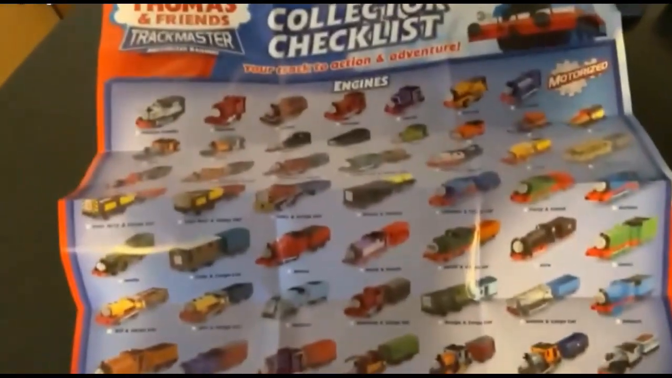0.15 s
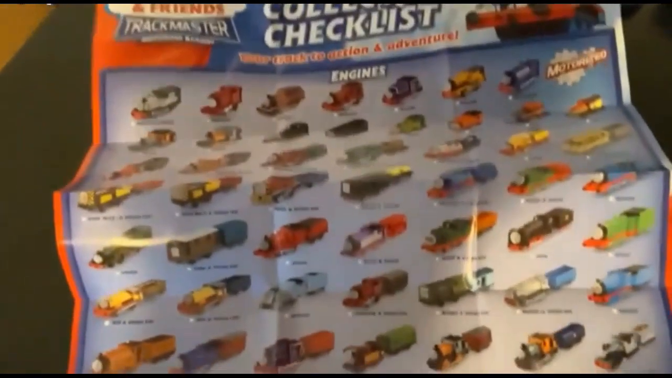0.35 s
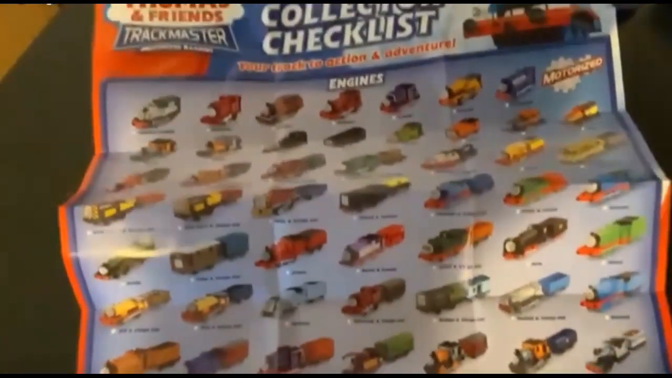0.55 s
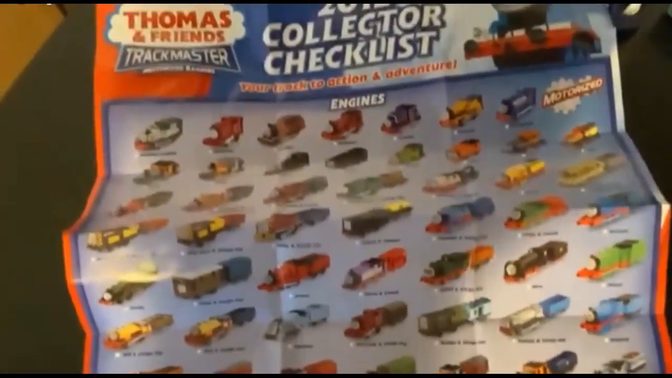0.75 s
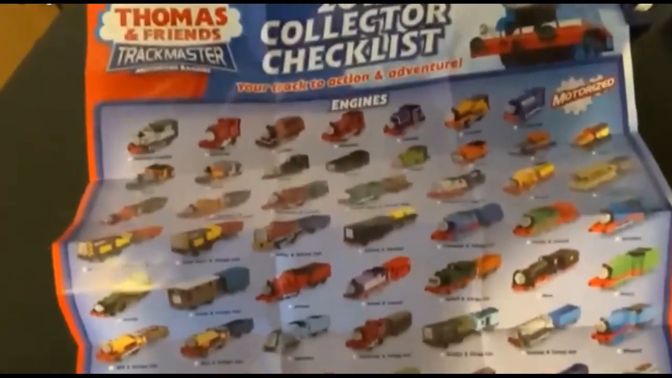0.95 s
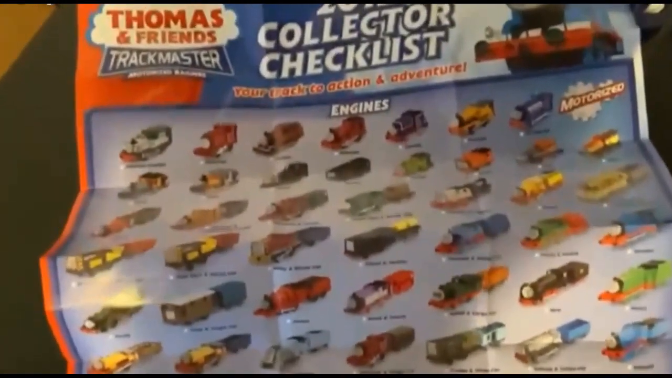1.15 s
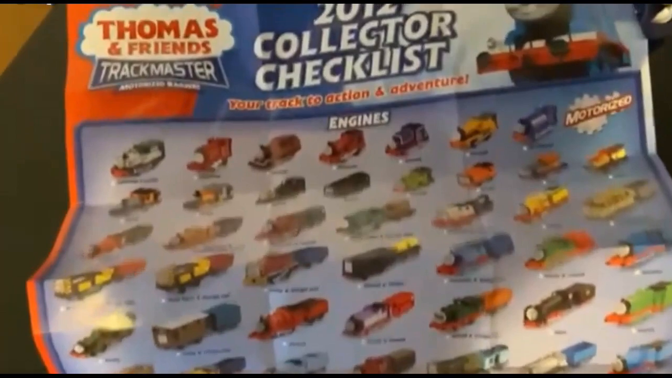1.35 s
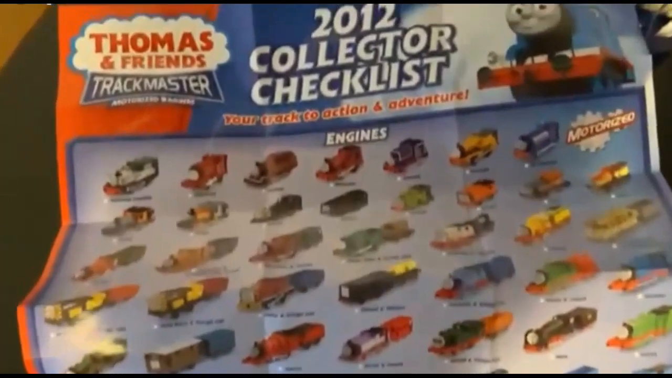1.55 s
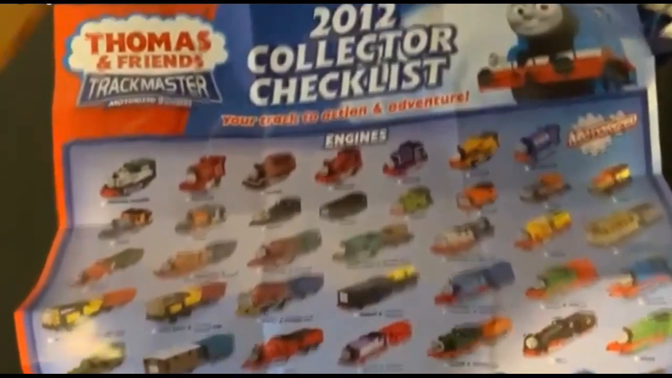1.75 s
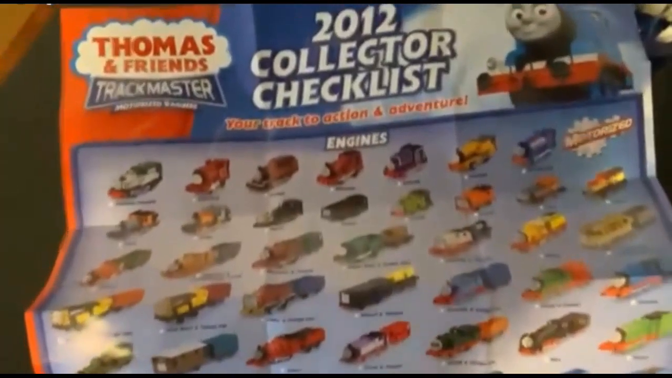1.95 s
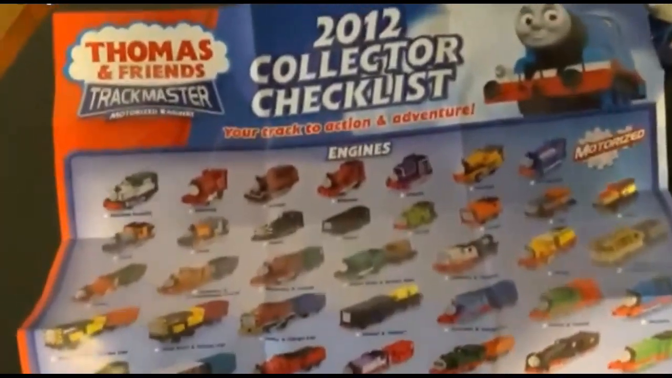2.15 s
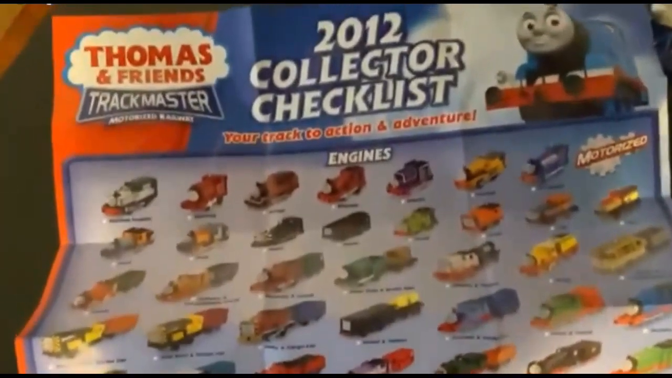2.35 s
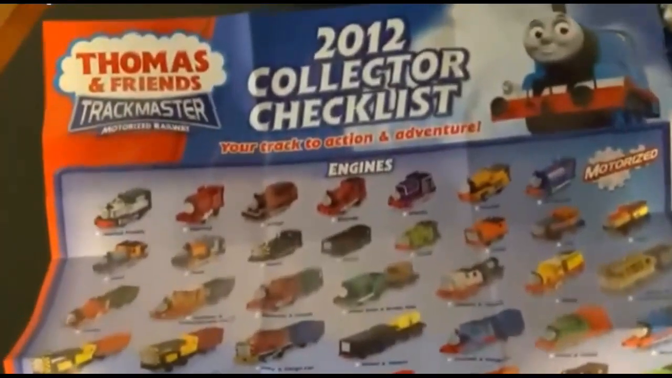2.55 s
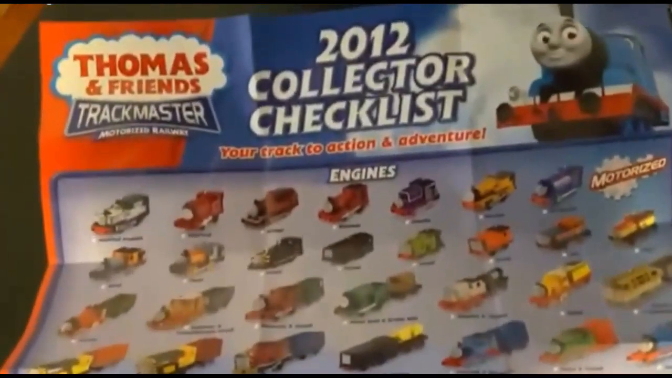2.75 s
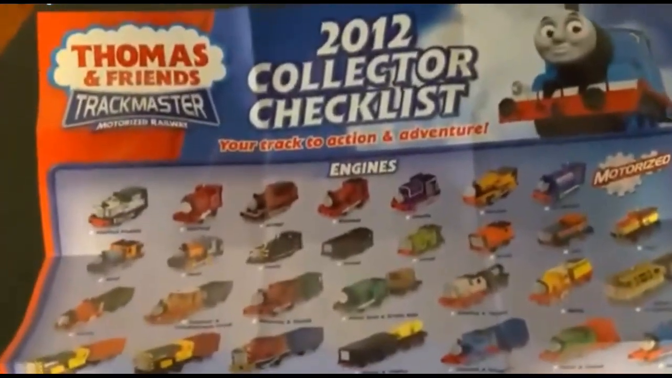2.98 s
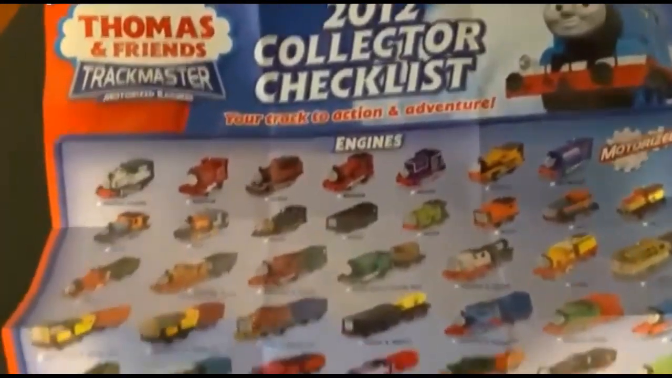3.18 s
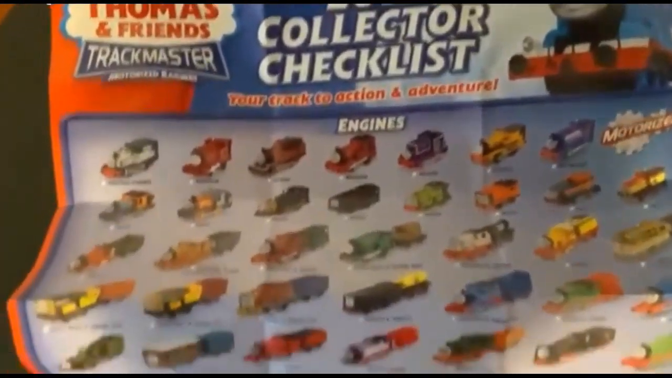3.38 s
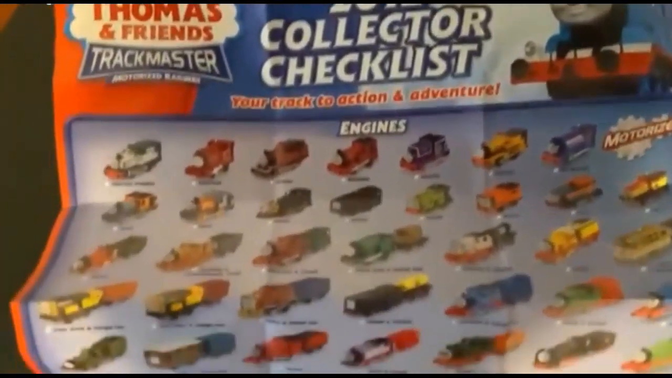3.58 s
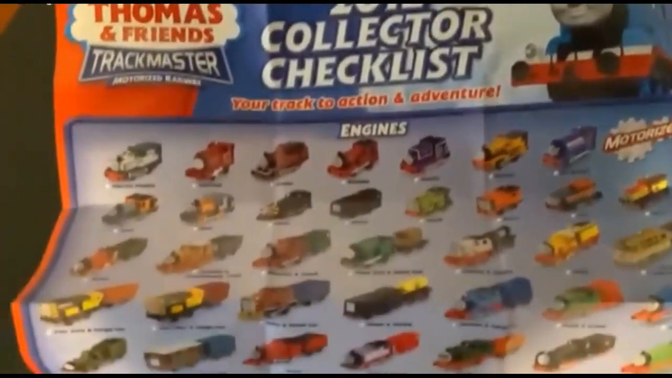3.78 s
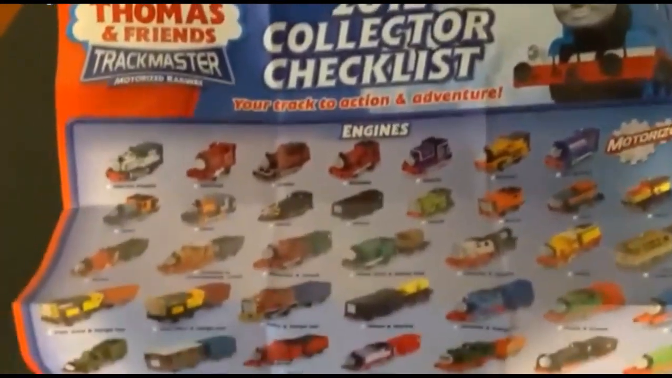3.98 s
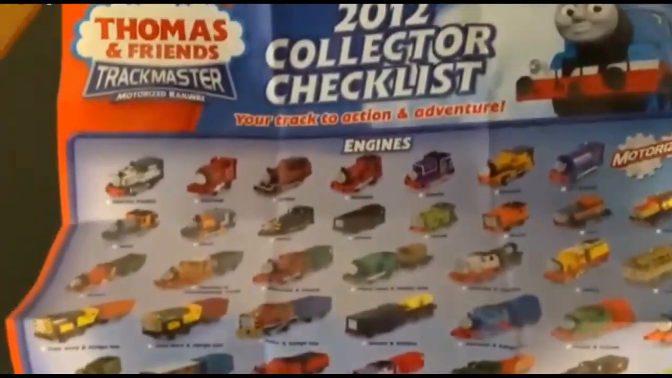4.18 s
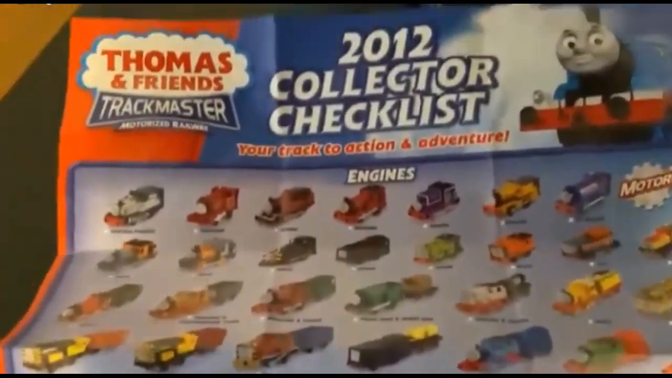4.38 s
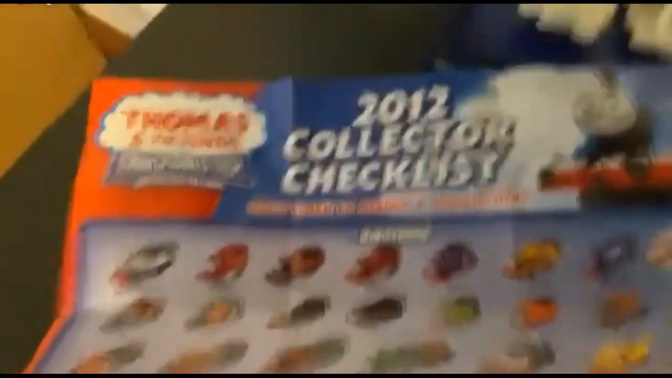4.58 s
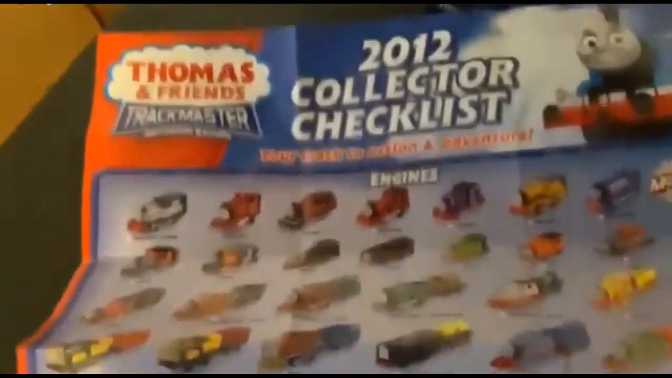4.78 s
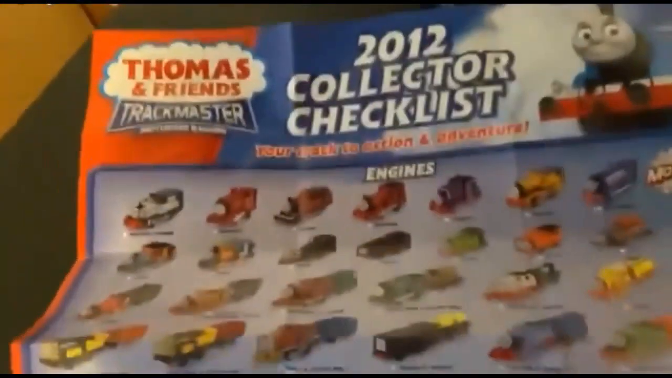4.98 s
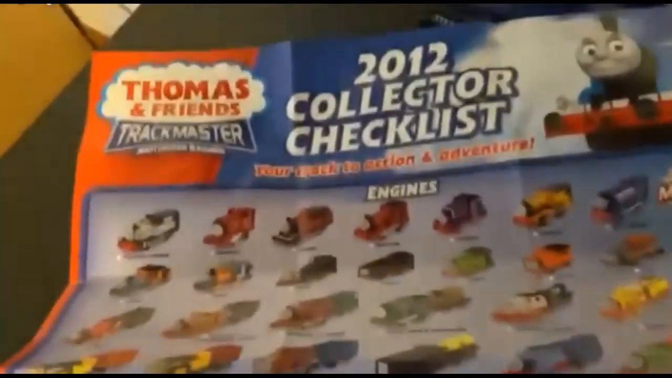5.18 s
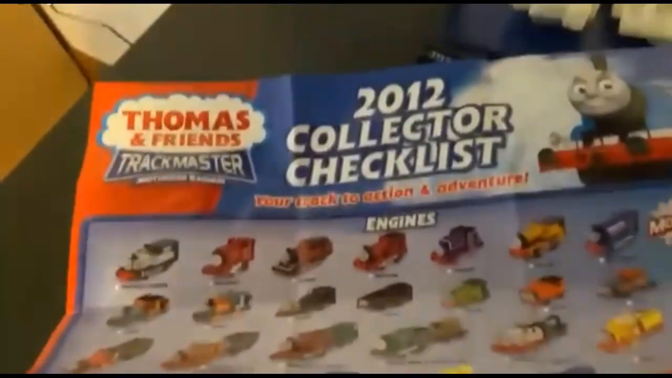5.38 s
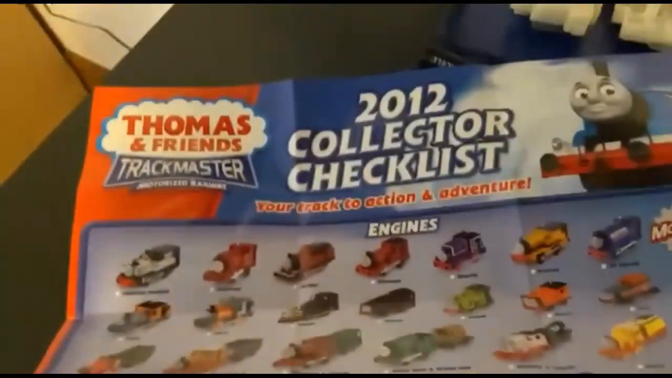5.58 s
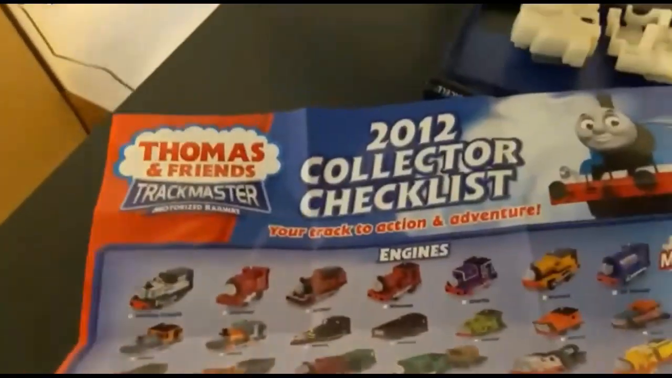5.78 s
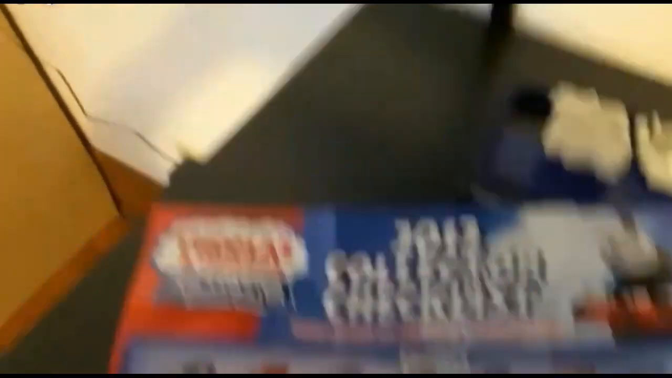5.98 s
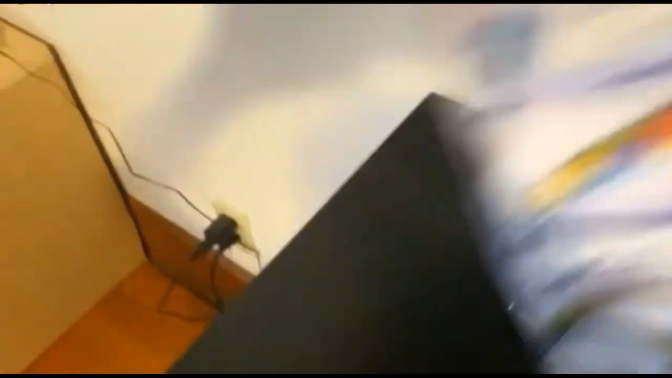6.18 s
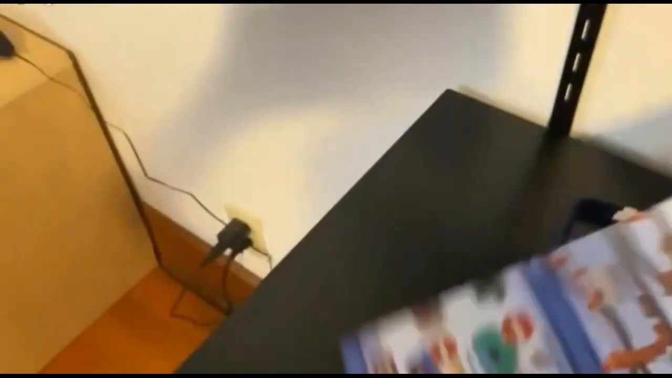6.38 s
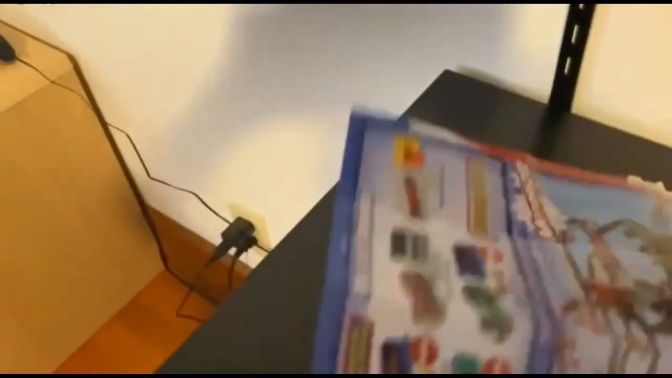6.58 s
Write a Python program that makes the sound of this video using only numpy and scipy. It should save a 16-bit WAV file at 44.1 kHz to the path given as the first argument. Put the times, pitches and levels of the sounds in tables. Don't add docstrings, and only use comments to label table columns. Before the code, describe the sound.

Close stereo camera microphone indoors with thin steady hiss. Fingers lightly tap and rub a big glossy paper sheet, each tap a small tick with a quick falling wobble. After long near-quiet stretches, a couple of firm thuds and a cluster of small clicks, the paper is turned over in a dense, bright, uneven rush of crinkles, pops and flaps, with a short room echo.

```python
import sys
import numpy as np
from scipy import signal
from scipy.fft import rfft, irfft, next_fast_len
from scipy.io import wavfile
from scipy.ndimage import uniform_filter1d

SR = 44100
rng = np.random.default_rng(int(sys.argv[2]) if len(sys.argv) > 2 else 0)


def ratio_of_db(decibels):
    return 10 ** (np.asarray(decibels, float) / 20)


def master(y):
    cut = np.clip(np.atleast_2d(y).T, -1, 1)
    pcm = np.round(cut * 32767)
    wavfile.write(sys.argv[1], SR, pcm.astype(np.int16))


N = 292824

# pitch_hz [Hz], likeness [0 to 1]
QUIET_LIKENESS = [(60, 0.87), (180, 0.66), (550, 0.09), (1650, 0.12), (4970, 0.31), (15000, 0.16)]


def unit(x):
    return x / np.sqrt(np.mean(x ** 2) + 1e-20)


def along(points, hz):
    point_hz, value = np.transpose(points)
    return np.interp(np.log(hz + 1), np.log(point_hz + 1), value)


def curves(rows):
    s, db, *others = np.transpose(rows)
    t = np.arange(N) / SR
    level = np.interp(t, s, db, left=-150, right=-150)
    return [level] + [np.interp(t, s, column) for column in others]


def filtered(x, response):
    length = next_fast_len(N + 8192)
    hz = np.fft.rfftfreq(length, 1 / SR)
    return irfft(rfft(x, length) * response(hz), length)[..., :N]


def ring(x, centre_hz, width):
    hz = np.fft.rfftfreq(x.shape[-1], 1 / SR)
    width_hz = width * centre_hz
    resonance = 1j * hz * width_hz / (centre_hz ** 2 - hz ** 2 + 1j * hz * width_hz)
    y = irfft(rfft(x) * resonance ** 2, x.shape[-1])
    return y / np.abs(y).max()


def shake(count, apart):
    return rng.standard_normal(count) + apart * rng.standard_normal((2, count))


def rush(spectrum, likeness, low_hz=1, high_hz=20000, patchy_db=0., wide_hz=1000, long_ms=8):
    spectra = signal.stft(rng.standard_normal((2, N)), nperseg=256)[2]
    patches = uniform_filter1d(rng.standard_normal(spectra.shape[1:]), 1 + int(wide_hz * 256 / SR), 0)
    patches = uniform_filter1d(patches, 1 + int(long_ms * SR / 128000), 1)
    pair = signal.istft(spectra * ratio_of_db(patchy_db * unit(patches)), nperseg=256)[1][:, :N]

    def mid_and_side(hz):
        band = ratio_of_db(along(spectrum, hz)) / (1 + (low_hz / (hz + 1)) ** 6) / (1 + (hz / high_hz) ** 6)
        angle = np.arccos(along(likeness, hz)) / 2
        return band * [np.cos(angle), np.sin(angle)]

    mid, side = filtered(pair, mid_and_side)
    return np.array([mid + side, mid - side]) / np.sqrt(np.mean(mid ** 2))


def hiss():
    # pitch_hz [Hz], level_db [dB per Hz]
    hiss_colour = [(710, 1), (1200, 0.5), (1470, 3), (1590, 0.5), (1670, 2), (2050, -0.5), (2230, 1),
                   (2570, -2), (6370, -5.5), (8240, -7), (12500, -11.5), (14400, -13), (15500, -37)]
    return ratio_of_db(-65.5) * rush(hiss_colour, QUIET_LIKENESS)


def hand():
    # time_s [s], grip_db [dB]
    grip_points = [(0.0, -37), (0.43, -43), (0.7, -37.5), (0.9, -41), (1.23, -42), (1.45, -47), (1.62, -44),
                   (2.07, -46), (2.37, -47), (2.6, -51.5), (2.97, -50), (3.22, -33.5), (3.29, -47.5),
                   (4.3, -48), (4.5, -35), (4.64, -44), (4.84, -37.5), (5.5, -49)]
    # pitch_hz [Hz], level_db [dB per Hz]
    rumble_colour = [(12, -28), (20, -30), (40, 6.5), (59, 6.5), (135, -1), (179, -11), (260, -32),
                     (340, -41), (570, -120)]
    # pitch_hz [Hz], level_db [dB per Hz]
    rustle_colour = [(110, -18.5), (180, -9), (259, -3.5), (333, -15.5), (579, -20), (681, -22.5),
                     (1390, -32.5), (2000, -35.5), (2600, -43), (4400, -120)]
    settle_db, settle_s, settle_takes_s = 6.5, 1.15, .08
    rustle_db, rustle_per_grip_db = -55, 0.083

    grip, = curves(grip_points)
    unsettled = (1 - np.tanh((np.arange(N) / SR - settle_s) / settle_takes_s)) / 2
    rumble = ratio_of_db(grip)
    rustle = ratio_of_db(rustle_db + rustle_per_grip_db * (grip + 48.5) + settle_db * unsettled)
    return (rumble * rush(rumble_colour, QUIET_LIKENESS, patchy_db=1.5, long_ms=23)
            + rustle * rush(rustle_colour, QUIET_LIKENESS, patchy_db=1.1, wide_hz=400, long_ms=34))


def fingers():
    # start_s [s], level_db [dB], centre_hz [Hz], length_ms [ms]
    creeps = [(0, -53, 1090, 110), (.2, -63, 580, 170), (.5, -70, 1000, 310), (.8, -62, 1350, 380),
              (2.993, -47, 840, 102), (3.06, -44, 196, 180), (3.07, -63, 2320, 280),
              (3.24, -54.5, 1510, 99), (4.424, -49, 576, 52), (4.491, -48.5, 660, 51),
              (4.626, -53.5, 665, 110), (4.639, -61, 2060, 100), (5.004, -61, 1250, 120),
              (5.402, -36.5, 2140, 84)]
    # start_s [s], level_db [dB], length_ms [ms], gloss_db [dB]
    wipes = [
        (0, -40, 5, -49),
        (0.096, -63, 100, -58),
        (3.156, -53.5, 120, -62),
        (4.369, -53, 68, -53),
        (4.622, -51, 81, -79),
        (4.853, -60.5, 95, -76),
        (4.902, -52, 76, -74),
        (4.941, -58, 29, -48),
        (4.982, -40.5, 31, -80),
    ]
    creep_width, creep_gloss_db = 0.56, -25
    wipe_hz, wipe_width = 2690, 3.2
    strokes = [(s, db, hz, creep_width, ms, db + creep_gloss_db) for s, db, hz, ms in creeps]
    strokes += [(s, db, wipe_hz, wipe_width, ms, gloss_db) for s, db, ms, gloss_db in wipes]

    out, t = np.zeros((2, N + SR)), np.arange(16384) / SR
    for start_s, level_db, centre_hz, width, length_ms, gloss_db in strokes:
        pressure = np.sin(np.pi * np.clip(1000 * t / length_ms, 0, 1) ** 0.26)
        stroke = pressure * shake(len(t), 1.0)
        rub = ratio_of_db(level_db + 9.0) * ring(stroke, centre_hz, width)
        gloss = ratio_of_db(gloss_db + 7.5) * ring(stroke, 13200, 0.43)
        out[:, round(start_s * SR):][:, :len(t)] += rub + gloss
    return out[:, :N]


def flexes():
    # start_s [s], peak_db [dB], swell_ms [ms], tick_db [dB]
    buckles = [(0.107, -25, 15.4, -40), (0.44, -41, 10, -28), (0.554, -27, 16.5, -39),
               (0.583, -26, 24, -40), (0.617, -31, 15, -37), (0.786, -27, 24, -40), (1.223, -33, 20, -43),
               (1.424, -36.5, 18, -30), (1.636, -28.5, 21.5, -35), (2.381, -10.5, 12.4, -26.5),
               (3.145, -5, 11.7, -19), (3.153, -5, 10.2, -34), (4.275, -29.5, 4.3, -6),
               (4.288, -23.5, 5.6, -11.5), (4.297, -27.5, 18, -33), (4.373, -23, 18, -19),
               (4.431, -34, 7.3, -30), (4.491, -36.5, 4.7, -4), (4.669, -36, 6, -20), (4.708, -27, 31, -34),
               (4.738, -39, 16, -51), (4.852, -34.5, 8.1, -10), (4.909, -32, 11, -21),
               (4.957, -26.5, 15.5, -6), (4.986, -18.5, 8.6, -46), (5.003, -31, 18, -32)]
    pulled_taut_s = 4.0
    slack_turns, taut_turns = 1.626, 1.87

    out, t = np.zeros((2, N + SR)), np.arange(4096) / SR
    for start_s, peak_db, swell_ms, tick_db in buckles:
        turns = slack_turns if start_s < pulled_taut_s else taut_turns
        u = 1000 * t / swell_ms
        swell = (u * np.exp(1 - u)) ** 2.01
        sweep = swell * np.cos(2 * np.pi * turns * np.log((t + 0.00066) / 0.003225))
        sides = ratio_of_db([[-.6], [.6]])
        tick = ratio_of_db(tick_db) * ring(shake(len(t), 1.0) * t ** 2 * ratio_of_db(-60 * t / 0.0053), 3850, 1.5)
        out[:, round(start_s * SR):][:, :len(t)] += ratio_of_db(peak_db) * (sweep * sides + tick)
    return filtered(out[:, :N], lambda hz: 1j * hz / (40 + 1j * hz))


def snaps():
    # start_s [s], peak_db [dB], large_hz [Hz], small_hz [Hz]
    small_creases = [
        (0.108, -37.5, 1660, 2480),
        (4.275, -27.5, 1250, 2320),
        (4.2877, -27.5, 1290, 2200),
        (4.4915, -57, 690, 4510),
        (4.9184, -37, 1040, 2600),
        (4.961, -32, 1000, 5730),
        (4.9876, -20, 900, 2580),
        (4.991, -18, 1700, 2200),
        (4.993, -21, 1760, 2320),
    ]
    # start_s [s], peak_db [dB], large_hz [Hz], small_hz [Hz], small_panel_db [dB over large]
    crisp_snaps = [(5.474, -25, 1100, 4480, 0), (5.481, -10.5, 1440, 3940, -6),
                   (5.518, 0.5, 2340, 3950, 0.5), (5.597, -8.5, 2270, 6850, 3),
                   (5.627, -1, 1550, 3270, -7.5), (5.661, 4, 1960, 4100, -3.5), (5.693, 1, 1370, 3800, -3),
                   (5.758, -8.5, 910, 3500, 4.5), (5.781, 2.5, 1390, 7060, -8.5),
                   (5.788, 1, 1820, 2310, -7), (5.911, 3.5, 1380, 6600, -13.5), (6.0, -4, 920, 3750, -3.5),
                   (6.065, -5.5, 835, 7060, -9), (6.118, -4, 730, 3900, 7), (6.213, -8.5, 900, 5040, 4),
                   (6.228, -6, 870, 5560, 0.5), (6.237, -6, 587, 2750, -22), (6.31, -9, 820, 3300, 1),
                   (6.463, -10.5, 1020, 3450, 10), (6.476, -5, 754, 3540, 4.5), (6.5, -12.5, 796, 2750, 10),
                   (6.527, -3, 940, 2660, 1.5)]
    # start_s [s], peak_db [dB], large_hz [Hz], swell_ms [ms]
    dull_pops = [(5.402, -20, 1130, 1.6), (5.402, -17, 2630, 1.36), (5.528, 0, 1990, 3),
                 (5.537, -14, 1550, 3.8), (5.646, 0, 1600, 2.3), (5.708, -25, 1020, 1.4),
                 (5.815, -2, 1690, 5.1), (5.825, 5.5, 1660, 1.8), (5.843, -8, 1610, 2.7),
                 (5.951, -4, 1320, 4.2), (6.027, -4.5, 936, 6.3), (6.298, -7, 606, 6.1),
                 (6.376, -10.5, 820, 8.2), (6.402, -7.5, 800, 2.2), (6.509, -1, 1610, 7.7)]
    tick_small_db, tick_ms, snap_ms = -11.5, 1.55, 2.87
    pop_small_hz, pop_small_db = 3060, -23.5
    creases = [(*row, tick_small_db, tick_ms) for row in small_creases]
    creases += [(*row, snap_ms) for row in crisp_snaps]
    creases += [(s, db, hz, pop_small_hz, pop_small_db, ms) for s, db, hz, ms in dull_pops]

    out, t = np.zeros((2, N + SR)), np.arange(4096) / SR
    for start_s, peak_db, large_hz, small_hz, small_db, swell_ms in creases:
        u = 1000 * t / swell_ms
        uneven = ratio_of_db(4 * np.repeat(rng.standard_normal(128), 32))
        slips = shake(len(t), .5) * uneven * u * np.exp(1 - u)
        crack = ratio_of_db(-14) * ring(slips * np.exp(-u), 8300, 1.5)
        large = ring(slips, large_hz, .65)
        small = ratio_of_db(small_db) * ring(slips, small_hz, .55)
        burst = large + small + ratio_of_db(max(small_db, -18)) * crack
        out[:, round(start_s * SR):][:, :len(t)] += ratio_of_db(peak_db - 3.5) * burst
    return out[:, :N]


def swing():
    # time_s [s], force_db [dB], sliding_db [dB over bending], fanning_db [dB over bending]
    move_tables = [
        [(5.39, -62, -30, -1), (5.41, -56.5, -15, 19), (5.442, -53.5, -35, -6), (5.474, -56, -5, -3)],
        [(5.476, -54, 8, 15), (5.488, -36, -6.5, 5.5), (5.592, -34, -0.5, 2.5), (5.646, -26.5, -9, -2),
         (5.7, -28, -3, 2), (5.752, -31.5, -4, -8), (5.808, -26.5, -14.5, 5.5), (5.922, -30.5, -11, -3),
         (5.99, -30, -19, 0)],
        [(5.992, -63, 28, -8), (5.998, -22.5, -15, -6), (6.116, -29.5, 3, -1), (6.182, -25.5, 0.5, -6.5),
         (6.234, -25, 5, 7), (6.316, -28.5, -6, -3.5), (6.358, -33, -16.5, 4), (6.448, -42.5, -13, -1.5),
         (6.456, -60, 15, 4)],
        [(6.458, -31.5, -9, -21), (6.478, -21.5, -10.5, -10.5), (6.552, -26, -14.5, -0.5),
         (6.618, -30.5, -7.5, -9), (6.64, -33, -8, -1)],
    ]
    # pitch_hz [Hz], level_db [dB per Hz]
    paper_colour = [(29, -15), (50, -2), (219, 1.5), (548, -3.5), (932, -4.5), (1030, -8), (1790, -4),
                    (2020, -1.5), (3790, -5.5), (6940, -8), (9500, -15.5), (14300, -21), (16200, -30)]
    # pitch_hz [Hz], likeness [0 to 1]
    paper_likeness = [(60, 0.81), (500, 0.66), (2000, 0.45), (15000, 0.21)]
    fold_hz = 2300
    grit_db, grit_ms = 1.5, 0.99
    moves = [curves(rows) for rows in move_tables]

    def strength(over_force_db, per_sliding_db):
        return sum(ratio_of_db(force + over_force_db + per_sliding_db * sliding) for force, sliding, _ in moves)

    flap = sum(ratio_of_db(force + fanning) for force, _, fanning in moves)
    flutter = strength(0.6, -0.28)
    crackle = strength(0.5, 0.34)
    slide = strength(0.27, 0.85)
    knots = rng.standard_normal(N // 16)
    roughness = np.interp(np.arange(N) * 1000 / SR / grit_ms, np.arange(len(knots)), knots)
    grit = unit(ratio_of_db(grit_db * roughness))

    def paper(low_hz, high_hz=20000, **patches):
        return rush(paper_colour, paper_likeness, low_hz, high_hz, **patches)

    return (flap * paper(33, 427, patchy_db=3.0, long_ms=35)
            + grit * flutter * paper(345, fold_hz, patchy_db=4.5, wide_hz=350, long_ms=12)
            + grit * crackle * paper(fold_hz * 1.07, 6800, patchy_db=4.5, wide_hz=250, long_ms=25)
            + grit * slide * paper(6830, patchy_db=2.5, wide_hz=400, long_ms=25))


def turned_aside(paper):
    # pitch_hz [Hz], lead [radians]
    left_lead = [(0, 0), (950, 0.1), (2240, -3.1), (2760, -5.9), (3790, -6.5), (6890, -6.3), (7750, -3.5),
                 (8010, -6.2), (8790, -6.5), (9820, -9.7), (10400, -12.6), (10900, -12.6), (14100, -12.6),
                 (15800, -12.3)]
    # pitch_hz [Hz], left_over_right_db [dB]
    left_tilt = [(60, -6.5), (110, -1), (200, -5), (380, -0.5), (700, -3.5), (1290, 1), (2380, 4.5),
                 (4400, -2), (8120, 1), (15000, -1)]

    def left_half(hz):
        return ratio_of_db(along(left_tilt, hz) / 2) * np.exp(.5j * along(left_lead, hz))

    lifted = np.arange(N) / SR > 5.3
    moved = filtered(paper * lifted, lambda hz: np.array([left_half(hz), 1 / left_half(hz)]))
    return paper * ~lifted + moved


def room(x):
    # pitch_hz [Hz], decay_s [s]
    decay_times = [(200, 0.29), (2000, 0.18), (10000, 0.15)]
    hz, t, z = signal.stft(shake(SR // 2, 0.95), SR, nperseg=256)
    fading = ratio_of_db(-60 * t / along(decay_times, hz)[:, None])
    tail = signal.istft(z * fading, SR, nperseg=256)[1]
    delayed = np.pad(x, ((0, 0), (200, 0)))
    return signal.fftconvolve(delayed, tail / np.linalg.norm(tail[0]), axes=1)[:, :N]


def scene():
    creases, bends = snaps(), flexes()
    paper = turned_aside(creases + swing() + fingers())
    echo = room(ratio_of_db(-15) * creases + ratio_of_db(-24) * bends)
    return paper + bends + echo + hand()


def housing(x):
    # pitch_hz [Hz], half_width_hz [Hz], depth_db [dB]
    hollows = [
        (8200, 64, 7.5),
        (9900, 860, 3.5),
    ]

    def colour(hz):
        loss_db = sum(depth / (1 + ((hz - centre) / half_width) ** 2) for centre, half_width, depth in hollows)
        return (hz < 16000) * ratio_of_db(-loss_db)

    x = filtered(x, colour)
    return filtered(x, lambda hz: 1j * hz / (22 + 1j * hz))


def dropout(x):
    # start_s [s], end_s [s]
    gap = (3.9378, 3.9697)
    t = np.arange(N) / SR
    return x * np.where((t > gap[0]) & (t < gap[1]), ratio_of_db(-45), 1)


def band_limit(x):
    return signal.sosfilt(signal.butter(12, 16320, fs=SR, output="sos"), x)


def record(dry):
    x = dry + hiss()
    x = x / (1 + np.abs(x / 1.05) ** 8) ** (1 / 8)
    x = dropout(housing(x))
    return band_limit(x)


dry = scene()
out = record(dry)
master(out)
```